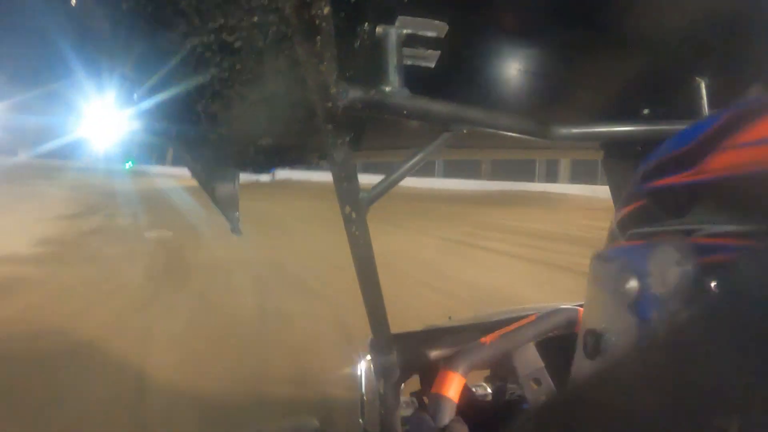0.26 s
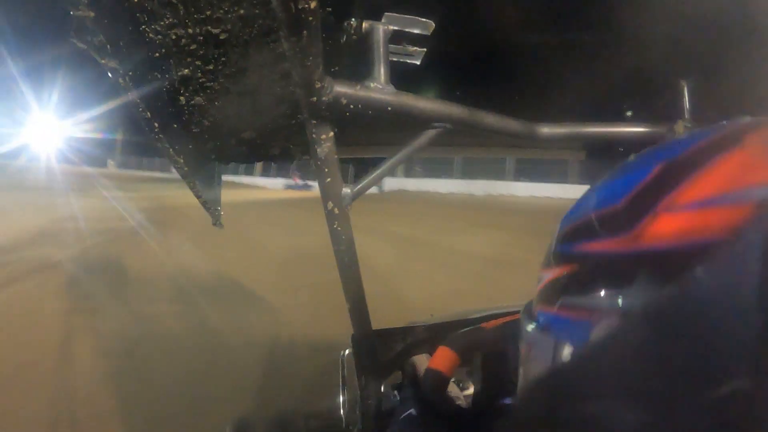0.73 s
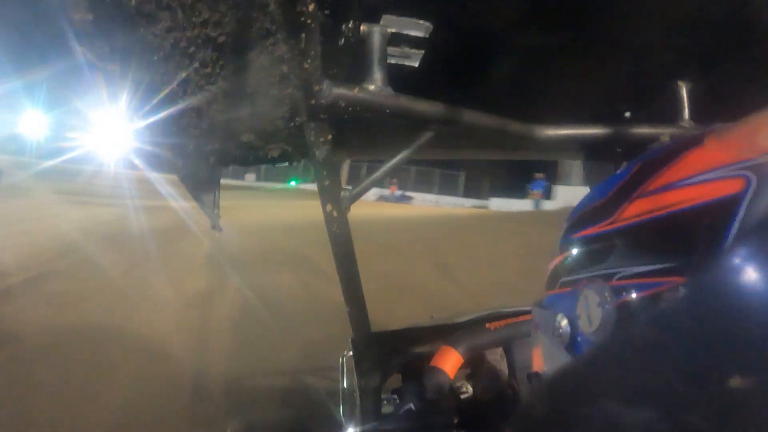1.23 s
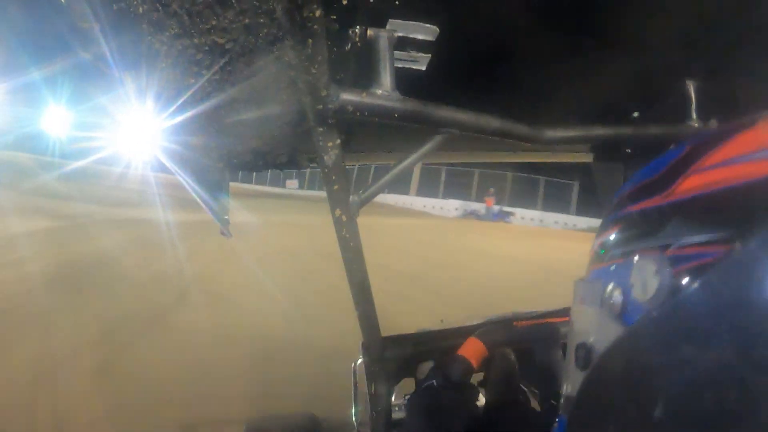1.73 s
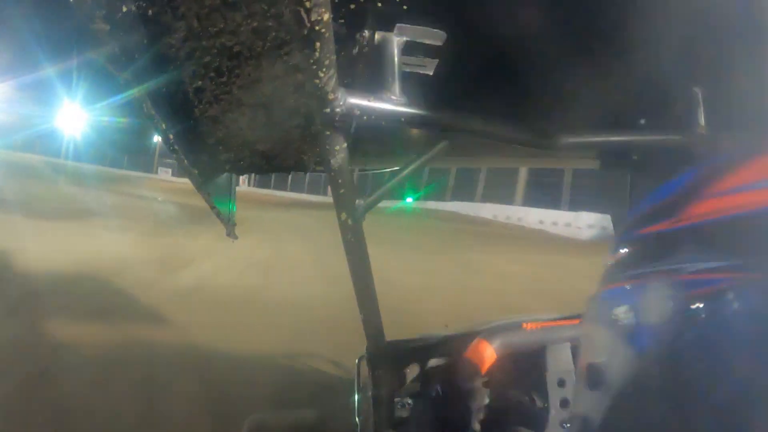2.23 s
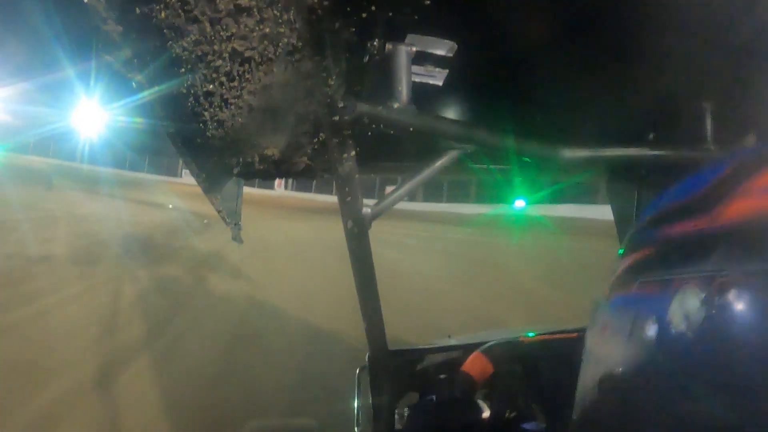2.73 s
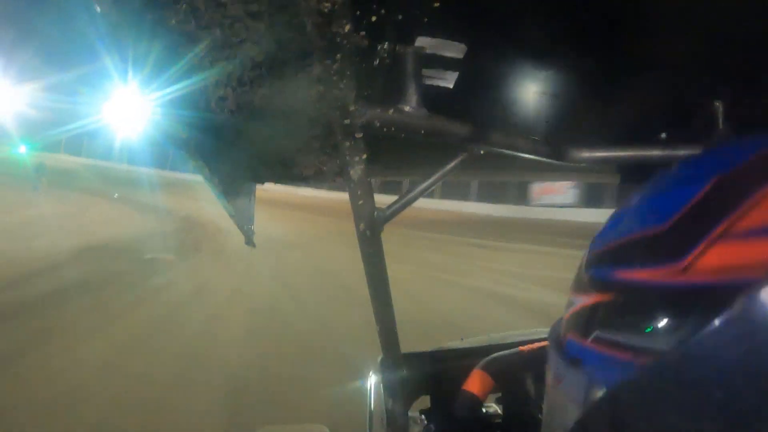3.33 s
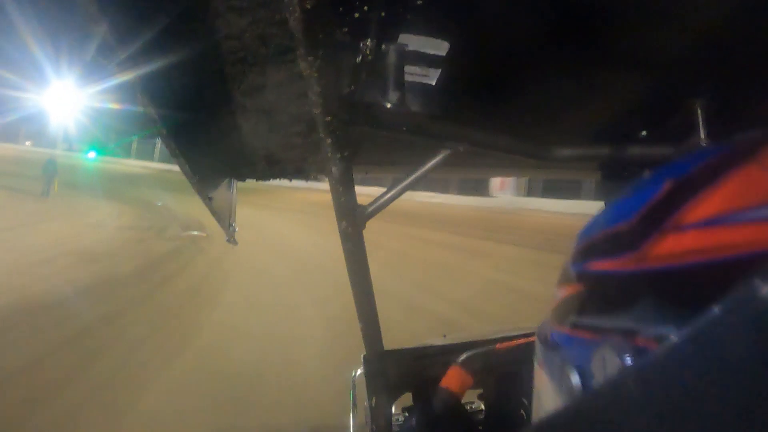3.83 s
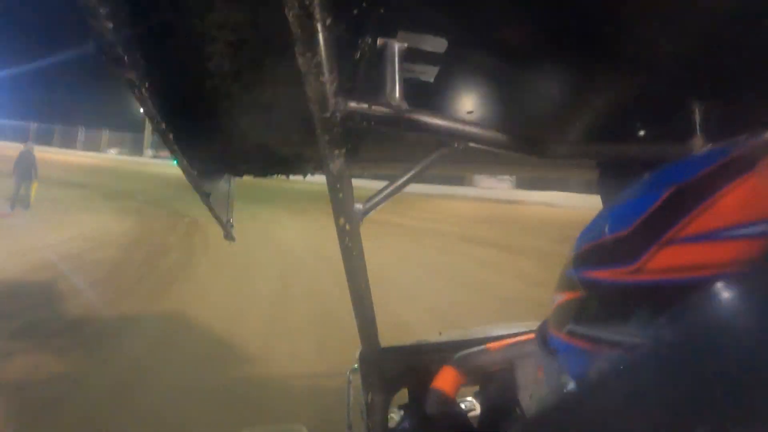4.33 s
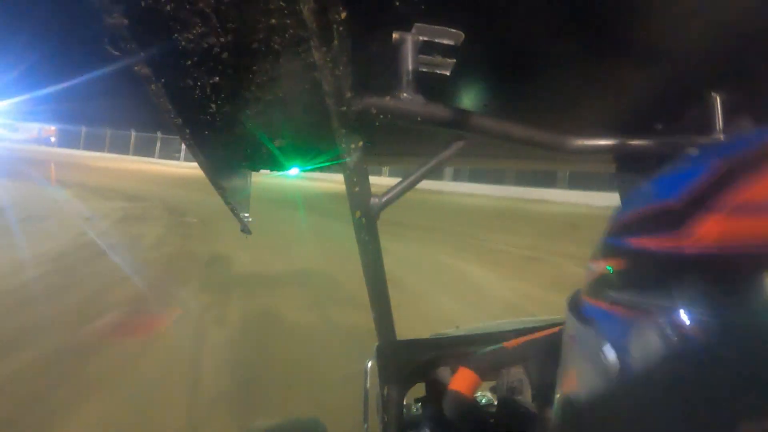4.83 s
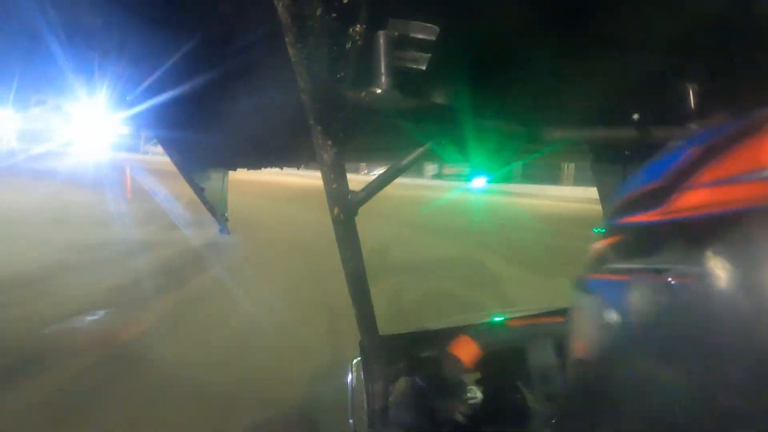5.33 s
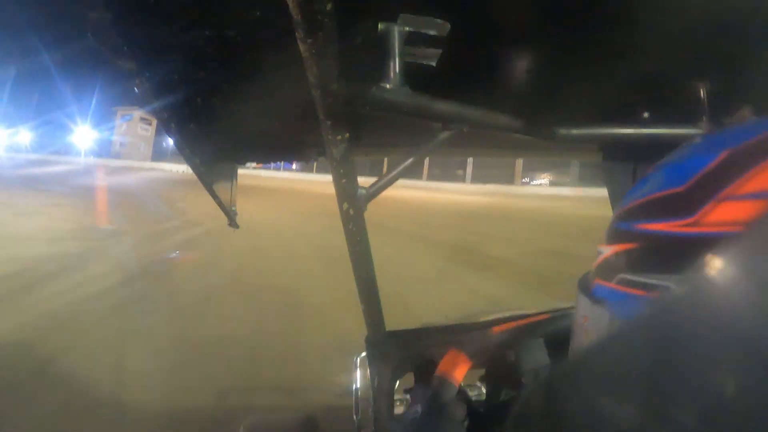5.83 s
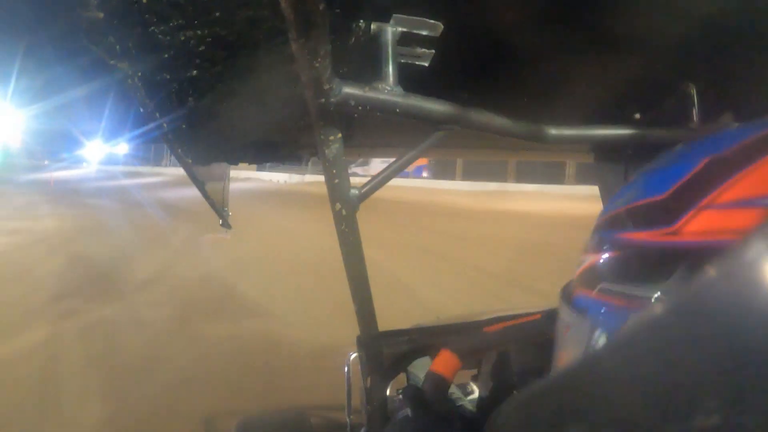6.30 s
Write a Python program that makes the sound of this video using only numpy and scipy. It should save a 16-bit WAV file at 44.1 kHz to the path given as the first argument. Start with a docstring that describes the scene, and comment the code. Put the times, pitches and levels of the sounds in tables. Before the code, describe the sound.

A dirt-track racing car runs at high, nearly constant revs, its loud engine droning and rasping throughout. Wind booms and throbs unevenly through the open cockpit, while loose metal panels chatter and clink, with short knocks as the car hits ruts. The drone swells for a while in the first half. The microphone rides close on the roll cage.

```python
"""A loud engine drones and rasps over booming wind and rattling metal.
It is a V8 dirt-track racer holding about 6000 rpm, heard from a camera on the roll cage.
Uneven firings drone in the exhaust and rasp through the bodywork; the open cockpit booms in the wind,
loose panels chatter over the ruts, and the camera's limiter holds the loud bass down."""
import sys
import numpy as np
from scipy import signal
from scipy.fft import rfft, irfft
from scipy.io import wavfile
from scipy.ndimage import uniform_filter1d, minimum_filter1d

SR = 44100
rng = np.random.default_rng(int(sys.argv[2]) if len(sys.argv) > 2 else 0)


def store_pcm(level_fs):
    """Save levels as 16-bit WAV."""
    pcm = np.round(np.clip(level_fs, -1, 1) * 32767).astype(np.int16)
    wavfile.write(sys.argv[1], SR, np.atleast_2d(pcm).T)


N = 289296
T = np.arange(N) / SR
FREQS = np.fft.rfftfreq(N, 1 / SR)

# overall tone of the metal panels: (frequency [Hz], level [dB])
PANEL_TONE = [(900, -11), (1800, -1), (2550, -1.5), (3050, -1), (3500, -9), (3900, -10.5), (4900, -16),
              (5600, -23.5), (6400, -24.5), (6700, -30), (7400, -30.5), (8100, -41), (8700, -50),
              (14000, -64)]
# pitches at which the panels ring: (frequency [Hz], width [Hz], strength over the overall tone [dB])
PANEL_RINGS = [(1795, 40, 4), (1950, 40, 0), (2360, 100, 3), (2705, 50, 7.5), (2835, 70, 8.5),
               (3290, 70, 2), (5070, 100, 4), (6230, 190, 2)]
# brief dips and surges of the rattling: (time [s], level change [dB])
RATTLE_SWINGS = [(.22, 2.5), (.66, 4.5), (1.81, -4), (2.935, -8), (3.28, 4.5), (3.77, 1.5), (4.03, 3),
                 (4.225, -12), (4.46, -0.5), (4.88, 3), (5.46, 3), (6.03, 3)]


def undb(db):
    """Turn decibels into a number to multiply by."""
    return 10 ** (np.asarray(db) / 20)


def unit(x):
    """Scale a signal to an average (rms) strength of 1."""
    return x / np.sqrt(np.mean(x ** 2))


def curves(table):
    """Join the points of a timed table with straight lines, one curve per value column."""
    times, *columns = np.transpose(table)
    return [np.interp(T, times, column) for column in columns]


def wobble(rate_hz):
    """A smooth random curve of size about 1, changing roughly rate_hz times a second."""
    return unit(irfft(rfft(rng.standard_normal(N)) * np.exp(-(FREQS / rate_hz) ** 2), N))


def bumps(table, half_width_s=0.022):
    """Short bell-shaped changes of level, in dB."""
    return sum(db * np.exp(-((T - s) / half_width_s) ** 2) for s, db in table)


def body(x, tone, rings):
    """Pass a sound through an object that colours its tone and rings at a few pitches."""
    hz, db = np.transpose(tone)
    gain = undb(np.interp(np.log(FREQS + 1), np.log(hz), db))
    peaks = sum(undb(level) ** 2 / (1 + (2 * (FREQS - pitch) / width) ** 2)
                for pitch, width, level in rings)
    cepstrum = irfft(np.log(gain * np.sqrt(1 + peaks)), N)
    # these two steps make the ringing follow each hit, never come before it
    cepstrum[1:N // 2] *= 2
    cepstrum[N // 2 + 1:] = 0
    return irfft(rfft(x) * np.exp(rfft(cepstrum)), N)


def clinks(per_s=24, uneven=.3, ring_hz=2880, spread_hz=70, decay_s=0.0086, attack_s=0.0013):
    """A small metal part jiggles: short rings in a loose rhythm, each at a slightly different pitch."""
    out = np.zeros(N + SR)
    age = T[:SR // 16]
    fade = np.exp(-age / decay_s) * (1 - np.exp(-age / attack_s))
    gaps, pitches, sizes = rng.standard_normal((N // 200, 3)).T
    times = np.cumsum(np.exp(uneven * gaps)) / per_s
    for s, pitch, size in zip(times[times < T[-1]], pitches, sizes):
        start = int(s * SR)
        ring = np.sin(2 * np.pi * (ring_hz + spread_hz * pitch) * age)
        out[start:start + len(age)] += undb(2 * size) * fade * ring
    return unit(out[:N]) * undb(-38.5 + bumps(RATTLE_SWINGS))


def chatter(taps_per_s=2500, spread_db=4, bounce_db=2.0, hiss=0.74, sway_db=0.3, level_db=-30):
    """Loose panels and flung dirt make dense taps, bunched together by the bouncing car."""
    taps = (rng.random(N) < taps_per_s / SR) * rng.choice([-1, 1], N)
    taps = taps * undb(spread_db * rng.standard_normal(N))
    force = (unit(taps) + hiss * rng.standard_normal(N)) * undb(bounce_db * wobble(55))
    rattle = unit(body(force, PANEL_TONE, PANEL_RINGS))
    return rattle * undb(level_db + sway_db * wobble(6) + bumps(RATTLE_SWINGS))


def knocks(decay_s=0.0056, attack_s=0.00037, cutoff_hz=2900, gain_db=-1):
    """Ruts press a loose panel against the cage: each contact is a short, buzzing knock."""
    # hard knocks of the panel: (time [s], relative level [dB])
    hits = [(0.266, -16), (0.62, -17), (1.389, -15.5), (1.447, -18), (1.644, -21.5), (1.697, -20),
            (2.199, -17), (2.756, -17), (3.217, -19), (3.463, -17.5), (3.764, -18.5), (4.029, -20.5),
            (5.576, -17.5), (5.928, -17), (6.395, -13.5), (6.413, -13), (6.503, -14)]
    contact = np.zeros(N)
    for s, db in hits:
        start = int(s * SR)
        age = T[:N - start]
        contact[start:] += undb(db) * np.exp(-age / decay_s) * (1 - np.exp(-age / attack_s))
    grit = signal.sosfilt(signal.butter(4, cutoff_hz, fs=SR, output="sos"), rng.standard_normal(N))
    steady_strength = np.std(body(grit, PANEL_TONE, PANEL_RINGS))
    return body(grit * contact, PANEL_TONE, PANEL_RINGS) / steady_strength * undb(gain_db)


def wind(gust_db=0.88, gust_hz=12):
    """Swirling air and tyre rumble shake the cage in quick gusts."""
    # strength of the wind: (time [s], level [dB])
    loudness = [(0, -17), (.9, -18), (2.0, -17), (2.35, -15.5), (4.05, -15.5), (4.5, -17.5), (5.3, -16),
                (6.56, -16.5)]
    # overall tone of the wind: (frequency [Hz], level [dB])
    tone = [(15, -25.5), (30, -17), (48, -6.5), (58, -10), (75, 0), (125, 1), (170, -1.5), (215, -2.5),
            (255, -7), (315, -7), (430, -16.5), (650, -25.5), (1500, -65.5), (14000, -95)]
    # ringing of the cockpit air: (frequency [Hz], width [Hz], strength over the overall tone [dB])
    cockpit_rings = [(96.1, 5, 2), (144.7, 12, 2.5)]
    level_db, = curves(loudness)
    rumble = unit(body(rng.standard_normal(N), tone, cockpit_rings))
    return rumble * undb(level_db + gust_db * wobble(gust_hz))


def cockpit_boom(waver_rad=0.49, drift=0.01603, flutter_db=2):
    """Air streaming past the open cockpit makes it throb unsteadily, like a blown bottle."""
    # the throbbing air: (time [s], pitch [Hz], level [dB])
    throb_path = [(0, 77, -15), (.25, 79.9, -16.5), (.42, 87.4, -19), (.58, 83.44, -16), (.8, 89.2, -15.5),
                  (.97, 79.1, -22.5), (1.13, 80.6, -16), (1.62, 78.8, -19), (1.83, 80.7, -15),
                  (2.1, 78.25, -17), (2.25, 84.8, -26), (2.55, 82.7, -25.5), (2.75, 80.8, -15),
                  (3.1, 83, -21), (3.6, 82, -16), (4.6, 80.8, -17.5), (5.25, 81, -18), (6.56, 82.15, -17)]
    # moments when the throb drops away: (time [s], level change [dB])
    dips = [(.88, -17), (1.5, -8), (2.0, -14), (3.17, -16), (4.24, -12)]
    hz, level_db = curves(throb_path)
    drifting_hz = hz * (1 + drift * wobble(5.26))
    phase = 2 * np.pi * np.cumsum(drifting_hz) / SR + waver_rad * wobble(25)
    throb = unit(np.sin(phase) * undb(flutter_db * wobble(16)))
    return throb * undb(level_db + bumps(dips, half_width_s=0.017))


def engine_rasp(turns, scatter_db=1.5, puff_decay=0.45, steady_flow=0.9, surge_db=0.36):
    """The engine fires four times a turn; each firing is a puff of gas that rings the engine bay."""
    # strength of the rasp: (time [s], level [dB])
    loudness = [(0, -21), (.4, -21), (1.8, -20.5), (2.2, -20.5), (3.2, -20.2), (3.9, -19), (4.45, -21.5),
                (5.1, -20), (6.56, -21.5)]
    # the eight cylinders in firing order: (relative level [dB])
    cylinders_db = [-5, -8, 4.5, -4.5, 0.5, -5.5, -4.5, 1]
    # overall tone of the engine bay: (frequency [Hz], level [dB])
    tone = [(200, -11.5), (500, -12), (700, -7), (920, -3.5), (1170, -2.5), (1380, -4.5), (1550, -8),
            (2000, -16), (2800, -15.5), (3600, -26), (5500, -38.5), (8000, -55), (14000, -90)]
    # ringing of the engine bay: (frequency [Hz], width [Hz], strength over the overall tone [dB])
    bay_rings = [(1020, 30, 0), (1162, 32, 5), (1226, 28, 4.5), (1335, 36, 3.5), (1420, 30, 1)]
    level_db, = curves(loudness)
    firing = (4 * turns).astype(int)
    age = 4 * turns - firing  # runs from 0 to 1 between firings
    size_db = np.array(cylinders_db)[firing % len(cylinders_db)]
    size_db = size_db + scatter_db * rng.standard_normal(N)[firing]
    puffs = undb(size_db) * np.exp(-age / puff_decay)
    gas = (steady_flow + puffs) * rng.standard_normal(N)
    return unit(body(gas, tone, bay_rings)) * undb(level_db + surge_db * wobble(8.7))


def exhaust_drone(turns, rough_below_db=-19, growl_rad_per_db=0.09, flutter_db=2.5, gain_db=-2):
    """Each row of cylinders fires twice a turn; the note is cleaner when strong and growls when weak."""
    # strength of the drone: (time [s], relative level [dB])
    loudness = [(0, -28), (.8, -29), (.9, -10.5), (1.0, -28), (1.35, -26), (1.52, -17.5), (2.03, -16.5),
                (2.19, -32), (2.32, -16.5), (2.76, -17), (2.85, -25), (2.93, -14.5), (3.19, -17),
                (3.33, -25), (4.4, -23), (6.56, -27.5)]
    # pure tones in the drone: (pitch [times the engine speed], relative level [dB], phase waver [rad])
    tones = [(.5, -21, 0.67), (1, -17, 0.34), (1.5, -5.5, 0.65), (2, 3.5, 0.59), (2.5, -19.5, 1),
             (3, -18, .7), (4, -18, 0.32)]
    level_db, = curves(loudness)
    growl = growl_rad_per_db * np.maximum(rough_below_db - level_db, 0)
    note = sum(undb(db) * np.sin(2 * np.pi * multiple * turns + (waver + growl) * wobble(14.2))
               for multiple, db, waver in tones)
    return unit(note) * undb(level_db + gain_db + flutter_db * wobble(19))


def scene():
    """Add engine, air and rattling metal into one channel."""
    # how fast the engine spins: (time [s], speed [turns per second])
    engine_speed = [(0, 96), (1.4, 96), (2.5, 98.8), (3.1, 100), (3.6, 104), (4.2, 100.5), (4.7, 102),
                    (5.1, 99.8), (6.56, 98.5)]
    turns_per_s, = curves(engine_speed)
    turns = np.cumsum(turns_per_s) / SR
    engine = exhaust_drone(turns) + engine_rasp(turns)
    return (engine + cockpit_boom() + wind() + chatter() + knocks() + clinks())[None]


def record(dry, ceiling=0.62, hold_s=0.0073, drive_db=1.25, cutoff_hz=14000):
    """A limiter turns everything down around loud peaks; a steep low-pass filter cuts the top treble."""
    x = dry * undb(drive_db)
    hold = int(hold_s * SR)
    needed_gain = ceiling / np.maximum(np.abs(x), ceiling)
    smooth_gain = uniform_filter1d(minimum_filter1d(needed_gain, hold), hold)
    return signal.sosfilt(signal.ellip(8, .2, 70, cutoff_hz, fs=SR, output="sos"), x * smooth_gain)


dry = scene()
out = record(dry)
store_pcm(out)
```